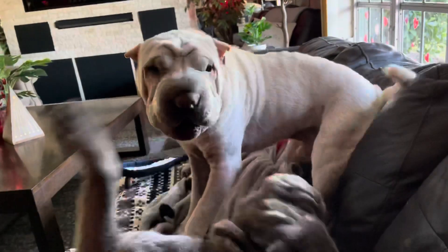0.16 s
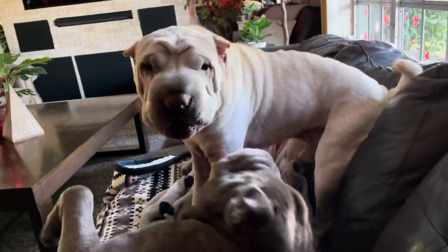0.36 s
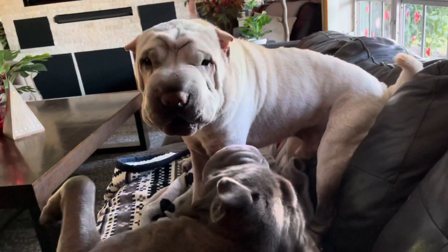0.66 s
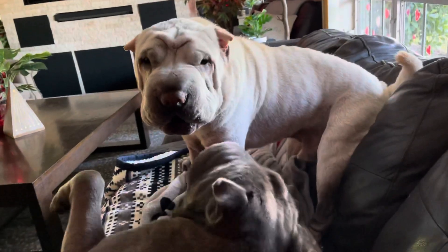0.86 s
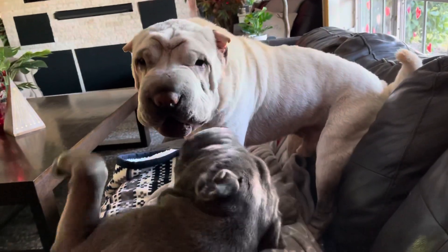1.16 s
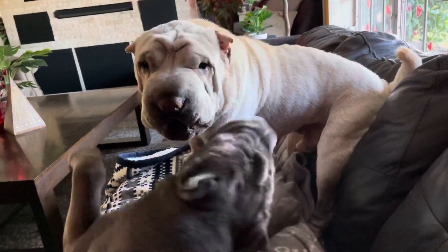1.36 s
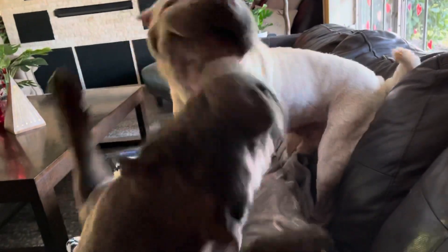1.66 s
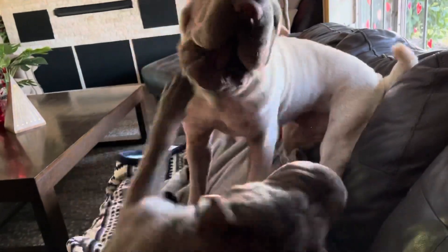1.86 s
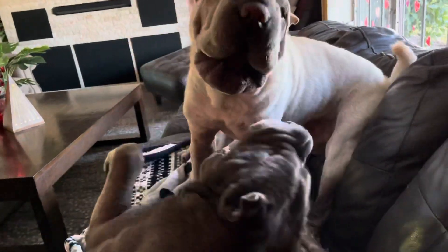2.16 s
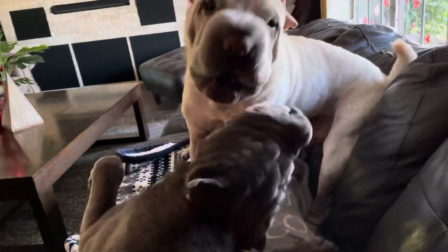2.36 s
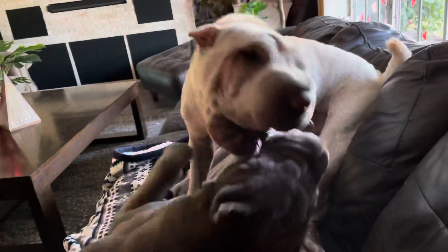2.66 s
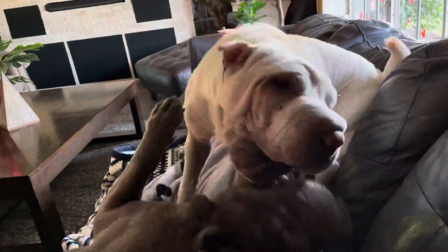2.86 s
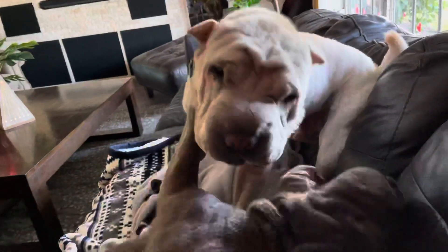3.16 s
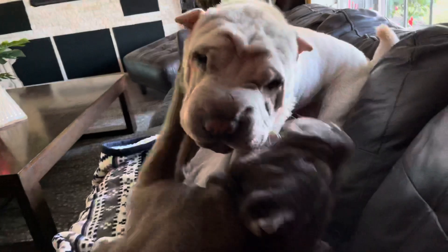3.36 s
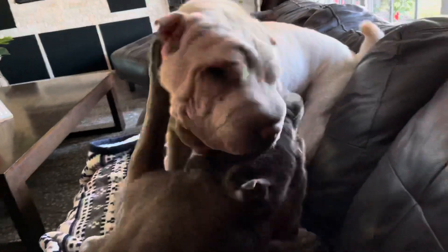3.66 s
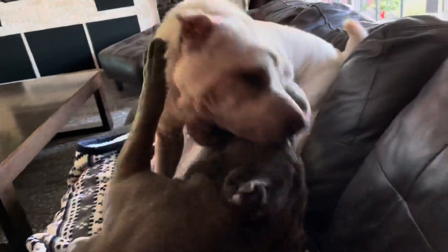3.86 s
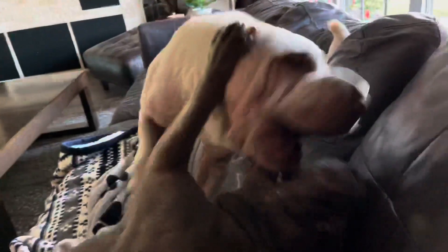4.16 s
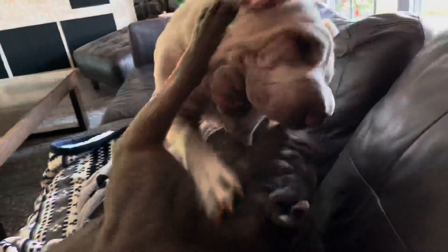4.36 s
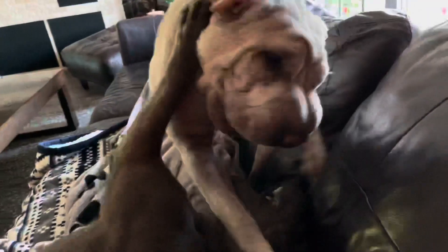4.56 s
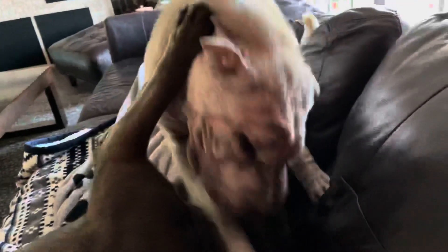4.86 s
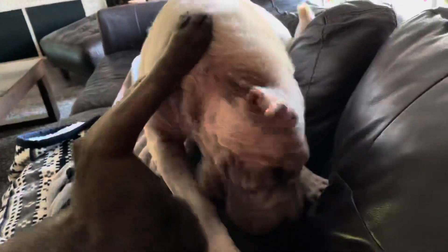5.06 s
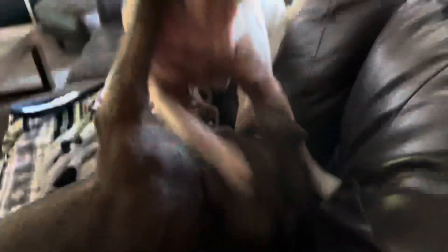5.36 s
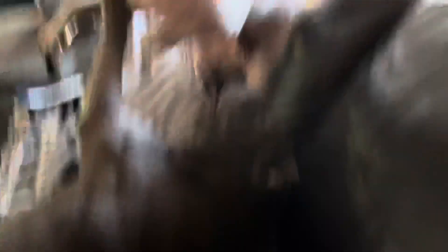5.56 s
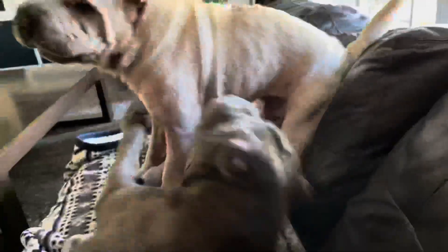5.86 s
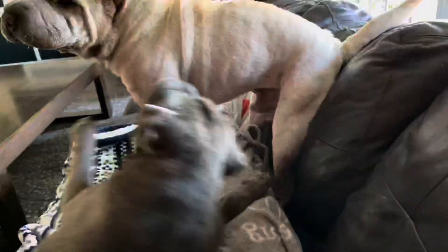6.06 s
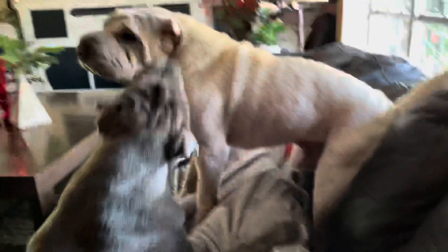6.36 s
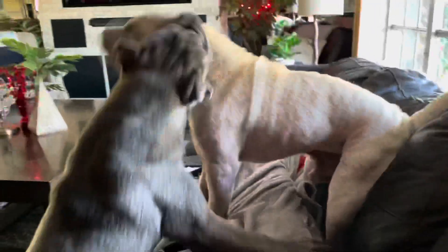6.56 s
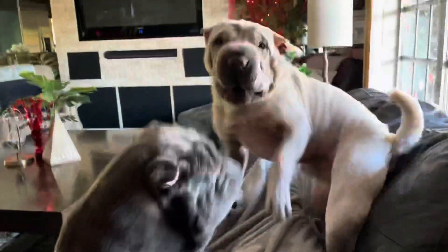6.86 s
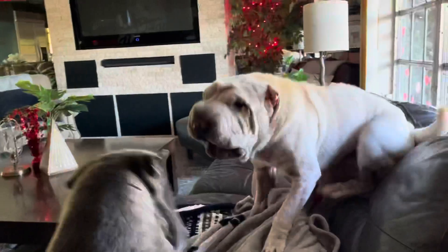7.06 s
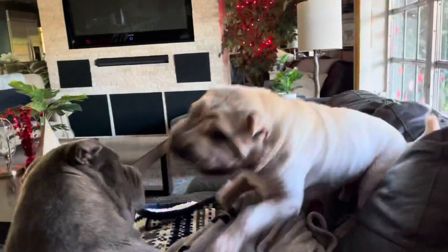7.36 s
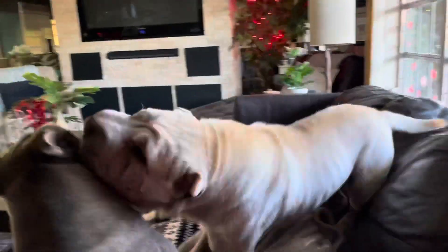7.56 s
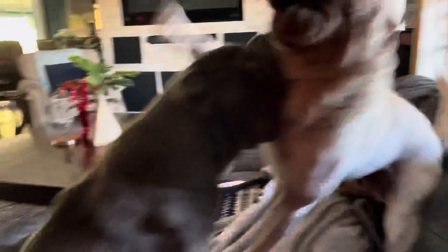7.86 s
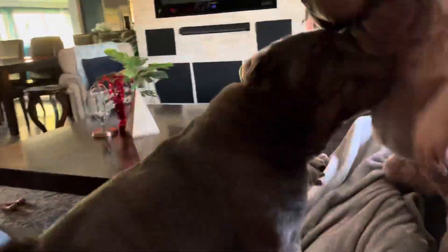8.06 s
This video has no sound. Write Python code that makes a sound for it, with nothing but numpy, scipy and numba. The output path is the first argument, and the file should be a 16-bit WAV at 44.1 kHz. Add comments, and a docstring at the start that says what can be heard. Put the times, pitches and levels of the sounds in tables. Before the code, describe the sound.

Two big dogs play-fight on a leather sofa, very close to a stereo microphone in a quiet, softly furnished room. From 0 to 0.4 s a breathy, rattling growl with a snort and a paw thump, then near quiet. Around 0.9-1.3 s a deep, slow fluttering growl pulses about fifty times a second. From 1.3 to 2.7 s short low hums and gruff, uneven growls alternate with snorts and tooth clicks. At 2.9-3.5 s come choppy growls and a small lip flutter. At 4.1 s one hard, bark-like throat burst is clearly loudest. Sparser rasps and breaths follow, with a snort and jaw snaps at 5.3 s and cushion bumps to 5.7 s. Airy panting leads near 6 s. Strong short growls return at 6.9 s, a leathery slap comes at 7.4 s, and humming growls with snaps crowd 7.5-8.2 s over deep rumble.

```python
"""Two dogs wrestle on a leather sofa in a living room, close to a microphone with two ports.
At first they growl in an uneven rattle of the vocal folds; near 0.9 s a slow warning flutter sets in quickly and
fades, and from 1.3 s the folds lock into short low hums. Loose lips flap at 3.1 s; the hardest flap of the throat
falls at 4.1 s. Near 6 s panting comes forward, then growls and hums return. Snorts, clicking teeth, paws and a deep
rumble run throughout. Fold pulses and air noise drive moving resonances; impacts ring short ones, in a quiet room."""
import sys
import numpy as np
from scipy import signal
from scipy.fft import rfft, irfft, next_fast_len
from scipy.io import wavfile
from scipy.ndimage import uniform_filter1d, map_coordinates
from numba import njit

SR = 44100
rng = np.random.default_rng(int(sys.argv[2]) if len(sys.argv) > 2 else 0)


def unload_audio(sound):
    """Save the sound as a 16-bit wav file, at the path given as the first command line argument."""
    columns = np.transpose(np.atleast_2d(sound))
    # keep every value between -1 and 1, then stretch to whole-number steps
    steps = np.round(np.clip(columns, -1, 1) * 32767)
    wavfile.write(sys.argv[1], SR, steps.astype(np.int16))


N = 362061
TIME = np.arange(N) / SR

# Table levels are set before the mix trims, the room and the microphone; attacks and releases are times for 20 dB.
# growls; the dB columns after throat_db are relative to it, the resonances shift further as the mouth opens:
# (start_s, length_s, release_s, fade_db over the length, throat_db, open_mouth_db, chest_db, rasp_db, snarl_db,
#  jaw_hz, tongue_hz, lip_hz)
GROWLS = [(0, 0.14, 0.04, 2, -38.5, 1.5, -2, -1, -6.5, 700, 1720, 2930),
          (0.13, 0.12, 0.09, 6.5, -39.5, -8, -5, -7, -9, 690, 1840, 2650),
          (0.347, 0.021, 0.16, -0.5, -49, -4.5, -10, -6.5, -12, 690, 1630, 2480),
          (1.33, 0.13, 0.07, 5, -39, -22, 0.5, -24, -24, 663, 1730, 2560),
          (1.47, 0.14, 0.11, 6.5, -40, -11.5, 2, -10.5, -15.5, 757, 2030, 2620),
          (1.646, 0.082, 0.03, 4.5, -35.5, -11, -6.5, -10, -17, 707, 1460, 3700),
          (1.787, 0.11, 0.033, 3.5, -38.5, -10, -0.5, -6, -16, 670, 1870, 3900),
          (2.081, 0.15, 0.055, -2.5, -35, -11, -4, -12, -10.5, 675, 1630, 2460),
          (2.25, 0.19, 0.094, 8.5, -40, -14, -10.5, -18, -11.5, 726.5, 1819, 2300),
          (2.463, 0.11, 0.071, 1.5, -36, -11, -3, -8, -15, 766, 2080, 2624),
          (2.684, 0.039, 0.038, 0, -39.5, -9.5, -16, -12, -11.5, 746, 1839, 3050),
          (2.911, 0.077, 0.065, -1, -34.5, -1.5, -4.5, -9.5, -7.5, 696, 1657, 2920),
          (3.004, 0.13, 0.024, 0.5, -38, -7, -6.5, -11.5, -10, 686, 1480, 3140),
          (3.135, 0.075, 0.04, 7, -34, -19, -7, -19, -20, 685, 1600, 3080),
          (3.23, 0.068, 0.034, 4.5, -42, -24, -9, -24, -15, 678, 1801, 3100),
          (3.425, 0.043, 0.042, -4, -35.5, -2, -1, -6.5, -10.5, 740, 1768, 2677),
          (3.659, 0.049, 1, 9, -49, -6.5, -17, -8, -17.5, 660, 1810, 2927),
          (3.804, 0.073, 0.045, 5.5, -40.5, -12, -1, -23, -19.5, 687, 1737, 3128),
          (3.939, 0.062, 0.07, 13.5, -39.5, 2, 6, -14, -15, 585, 1900, 4050),
          (4.001, 0.044, 0.036, -4.5, -24.5, -7.5, -4, -18, -14.5, 543, 1620, 3800),
          (4.065, 0.074, 0.044, 1.5, -21.5, -17.5, -8.5, -28, -18.5, 786, 1730, 3500),
          (4.211, 0.069, 0.037, 8, -42, -4, -2.5, -3, -5, 767, 2200, 2530),
          (4.326, 0.031, 0.025, -4, -32.5, -12, -3.5, -14, -6, 728.6, 1440, 3047),
          (4.539, 0.1, 0.098, 0.5, -42.5, -5.5, 3, -8, -9, 672.6, 1490, 2770),
          (4.914, 0.14, 0.077, -5, -48, -9, 7.5, -3.5, -10.5, 643, 1867, 2940),
          (5.073, 0.049, 0.061, -4, -33, -11, -8, -12.5, -17.5, 682, 1630, 3350),
          (5.169, 0.084, 0.061, -5.5, -54, -7, 8, 2, 9, 716, 1880, 2995),
          (5.292, 0.12, 0.096, -5, -44, 7, 4.5, 5.5, -9, 833, 1671, 3214),
          (5.633, 0.12, 0.13, -2, -48.5, -23, 0, -9.5, -11, 628, 1560, 2780),
          (6.46, 0.051, 0.086, -4.5, -50.5, -36, 1.5, -7, -10, 560, 1978, 2880),
          (6.858, 0.087, 0.024, 0, -28, -10, -3.5, -7.5, -13.5, 728, 1682, 3437),
          (6.966, 0.054, 0.046, 4, -36, -0.5, 2, -3, -12.5, 691, 1970, 2950),
          (7.04, 0.1, 0.16, 2, -48, -1, 0.5, -2.5, -7, 746, 1800, 2970),
          (7.538, 0.052, 0.059, 2, -39, 2, 3.5, -16.5, -15.5, 570.3, 1850, 3230),
          (7.607, 0.062, 0.07, 4.5, -31.5, -26, 0.5, -13, -15, 587.4, 1670, 3000),
          (7.756, 0.028, 0.039, -1, -40.5, 9, 7, 0, -5, 827.5, 1514, 3080),
          (7.835, 0.049, 0.21, 3.5, -30.5, -8.5, -1.5, -9, -14, 639.8, 1838, 3378),
          (7.932, 0.098, 0.067, 7, -29.5, -7, -9, -11, -17.5, 729, 1730, 2600),
          (8.036, 0.066, 0.028, -7, -36.5, -14, -6.5, -1.5, -8.5, 683.6, 1764, 3050),
          (8.165, 0.07, 0.06, 3, -33.5, -20, -14, -5, -21, 682, 1822, 2647)]
GROWL_ATTACK_S = 0.029
NOSE_SHARE_DB = -23.5   # air through the nose in every growl, relative to the throat
# the rattle of slack folds: (time_s, closures_per_s, unevenness as log spread, relative leak of air)
RATTLE = [(0, 110, .12, 1.6), (.25, 100, .12, 1.4), (.85, 104, .07, .15), (1.3, 108, .05, .1),
          (1.7, 94, .22, .55), (2.1, 77, .1, .3), (2.45, 77, .1, .3), (2.9, 95, .1, .7), (3.2, 77, .1, .35),
          (4.3, 80, .22, .55), (6.9, 100, .13, .35), (8.21, 103, .2, .55)]
# low tones: the folds lock into a hum, except at 7.05 s, where low room resonances near 130 Hz ring on after the
# bark: (start_s, length_s, level_db, fade_db, start_hz, middle_hz, end_hz)
LOW_TONES = [(1.345, 0.074, -26, 6, 124, 121.6, 110.1), (1.49, 0.078, -22.5, -2, 119.2, 121, 126.4),
             (1.61, 0.033, -21, 2, 136.3, 138.8, 138.2), (2.48, 0.097, -27, -8, 109.3, 107.1, 107.6),
             (3.82, 0.068, -28.5, -17, 137.4, 134.8, 132.3), (3.93, 0.12, -22.5, -10, 154.3, 154, 147.6),
             (4.07, 0.073, -21.5, 6, 137.7, 133.4, 122.3), (4.925, .11, -29, -4, 108.6, 104.3, 107.5),
             (5.06, 0.072, -26, -8, 123, 120.3, 123.2), (5.17, 0.067, -32, 10, 109, 105.5, 105.6),
             (6.864, .08, -23.5, 0, 123.8, 132.8, 136.1), (6.975, 0.059, -26, 9, 118.4, 120.9, 128.9),
             (7.05, .08, -40.5, 8, 129, 129.9, 130), (7.552, 0.12, -21, 5.5, 138.6, 145.5, 125.2),
             (7.836, 0.031, -21, 4, 131.4, 135.9, 146.5), (7.926, 0.083, -23.5, 3.5, 153, 153.7, 155.1)]
TONE_ATTACK_S, TONE_RELEASE_S, LOCK_MARGIN_S = 0.0055, 0.036, .018
# the mouth narrows and one resonance sings out and glides:
# (start_s, length_s, level_db, fade_db, start_hz, end_hz, width_hz)
SQUEEZES = [(.01, .13, -42, 4, 1080, 1150, 200), (1.342, 0.034, -41, -2, 855, 890, 120),
            (1.658, 0.016, -40, 5, 1930, 1950, 110), (1.693, 0.031, -31, 4, 700, 730, 50),
            (1.705, 0.022, -38, 7, 1730, 1950, 130.3), (1.648, 0.073, -43.5, -9, 3720, 3620, 220),
            (1.719, 0.053, -40.5, 8, 970, 1199, 90), (1.78, 0.096, -37.5, 8, 1070, 1140, 80.4),
            (1.783, 0.047, -43, -4, 3650, 3950, 700), (2.112, 0.081, -34.5, 13, 663, 737, 50),
            (2.157, 0.062, -51, -4, 3700, 3700, 240), (2.254, 0.18, -49.5, -1, 1600, 1960, 90),
            (2.487, .1, -40, 1, 2693, 2563, 110.3), (2.472, 0.14, -37, 7.5, 869.3, 881, 125.8),
            (3.16, 0.058, -35, 7, 720, 684.3, 40), (3.259, .05, -57.5, 6, 1775, 1800, 80.22),
            (3.982, 0.034, -43.5, -5, 2160, 2137, 108), (3.983, 0.031, -40.5, -4, 1228, 1560, 80.07),
            (4.02, 0.023, -33, -5, 1629, 1679, 49.85), (4.022, 0.023, -38.5, 0, 1810, 1940, 60),
            (4.022, 0.031, -41.5, -5, 3700, 3550, 350), (4.094, 0.038, -20.5, 7, 740, 850, 119),
            (4.213, 0.037, -45, 1, 2800, 2630, 120), (4.23, 0.04, -43.5, -1, 2219, 2483, 89.9),
            (5.073, 0.056, -38.5, 1, 1670, 1731, 110), (5.145, 0.036, -51, 5, 3200, 2880, 200.3),
            (5.351, 0.056, -37, -7, 2020, 2373, 450), (5.366, 0.12, -44, 4, 1137, 1200, 110),
            (5.642, 0.135, -59.5, -3, 2620, 2550, 90), (6.865, 0.06, -28, 1, 850, 792.3, 110),
            (6.928, 0.016, -26, -6, 699.5, 678.5, 60.1), (6.93, 0.075, -36.5, 6, 930, 981, 129.9),
            (6.863, 0.14, -56, -3, 2810, 2964, 180), (7.674, .055, -46.5, -5, 2760, 2834, 170),
            (7.767, 0.042, -31.5, 2, 1067, 916.4, 109.8), (7.92, 0.04, -25.5, -1, 700.4, 795, 70.02),
            (7.938, 0.054, -34, 6, 1148, 1660, 130.6), (7.964, 0.063, -36, 0, 2530, 1877, 220),
            (7.957, 0.087, -42.5, 3, 3020, 3120, 300.5), (8.078, 0.032, -41, 0, 2998, 3353, 200.6),
            (8.083, 0.019, -29, 10, 643, 681.5, 50.1)]
SQUEEZE_ATTACK_S, SQUEEZE_RELEASE_S = 0.015, 0.018
# snorts through the nose: (start_s, length_s, level_db, attack_s, release_s)
SNORTS = [(0.087, 0.087, -41.5, 0.19, 0.11), (1.237, 0.21, -67.5, 0.51, 0.083),
          (1.49, 0.1, -54.5, 0.092, 0.082), (1.663, 0.15, -46, 0.2, 0.12), (2.116, 0.37, -54.5, 0.055, 0.1),
          (2.483, 0.059, -38.5, 0.045, 0.098), (2.676, 0.029, -52.5, 0.048, 0.056),
          (2.889, 0.32, -48, 0.045, 0.16), (3.431, 0.03, -40.5, 0.06, 0.097),
          (3.995, 0.041, -48.5, 0.18, 0.15), (4.211, 0.14, -47, 0.14, 0.028),
          (4.558, 0.11, -45, 0.19, 0.094), (4.914, 0.61, -55, 0.2, 0.12), (5.315, 0.11, -31.5, 0.14, 0.073),
          (5.69, 0.043, -64, 0.23, 0.27), (6.031, 0.07, -47.5, 0.099, 0.17),
          (6.643, 0.068, -56, 0.1, 0.081), (6.885, 0.02, -44, 0.087, 0.22),
          (7.657, 0.14, -44.5, 0.19, 0.019), (7.838, 0.29, -52, 0.054, 0.047),
          (8.189, 0.04, -46.5, 0.034, 0.077)]
# the warning growl, a slow flutter of the folds: (time_s, strong_closures_per_s)
FLUTTER = [(.882, 51.4), (1.125, 51.6), (1.145, 45.5), (1.33, 45.5)]
# level of the flutter, one row: (start_s, length_s, level_db, fade_db, attack_s, release_s)
FLUTTER_LEVEL = (.91, .4, -33, 5, .03, .16)
# chest, throat and mouth ringing under the flutter:
# (resonance_hz, width_hz, level_db, fade_db_per_s as the mouth closes)
FLUTTER_RINGS = [(51.6, 15, -15, 0), (143, 58, -3, -3), (220, 27, -7, -4), (616, 82, -1.5, 7),
                 (740, 47, -14, -1), (970, 20, -15.5, 10), (1570, 84, -18.5, 5), (1850, 61, -22, 4)]
FLUTTER_WEAK_DB = -11   # the weak closures between the strong ones, as the throat gets them
# voiceless pants; mouth_db and teeth_db are relative to throat_db:
# (start_s, length_s, throat_db, mouth_db, teeth_db, jaw_hz, tongue_hz, lip_hz)
PANTS = [(1.935, 0.13, -54, -1.5, -2.5, 726, 2150, 3003), (2.744, 0.38, -56, -10.5, -4, 696, 1440, 2800),
         (3.522, 0.092, -60.5, 1, -3, 674, 2350, 2615), (4.422, 0.073, -52, -7.5, -4, 716, 1609, 2959),
         (4.752, 0.12, -57, -9, -14, 715, 1610, 3220), (5.465, 0.12, -60, -3, -4, 710, 1638, 2592),
         (5.932, 0.25, -52.5, -8.5, -6, 690, 1738, 2713), (6.252, 0.27, -65, -6, -0.5, 686, 1570, 2950),
         (6.62, 0.071, -48.5, -4, -4.5, 830, 1857, 3600), (7.27, 0.19, -56.5, -8, -5.5, 620, 1570, 3093)]
PANT_ATTACK_S, PANT_RELEASE_S = 0.037, 0.092
# loose lips flap in the breath of a growl, one row: (first_s, flaps_per_s, level_db, loss_db per flap, resonance_hz)
LIP_FLAPS = (3.122, 27.5, -41, 1.8, 3300)
# single hard flaps of throat and jowls: (time_s, peak_db, resonance_hz)
FLAPS = [(.035, -21.5, 726), (.176, -24, 636), (.468, -42, 675), (.612, -48, 517), (.9975, -19, 617),
         (1.037, -19, 623), (1.093, -21, 610), (1.132, -19, 630), (1.177, -21, 680), (1.2205, -19.5, 680),
         (1.785, -23.5, 570), (1.834, -26, 500), (1.859, -34, 1100), (1.884, -26, 1090),
         (2.079, -16.5, 630), (2.217, -27, 680), (2.264, -34, 704.8), (2.909, -22.5, 704),
         (2.927, -18, 710.3), (2.96, -25, 1020), (3.088, -21, 658.2), (3.131, -17, 646.4),
         (3.202, -26, 650), (3.29, -28, 676), (3.439, -19, 647), (3.467, -24, 720), (3.862, -24, 648.4),
         (4.002, -23, 673.8), (4.074, -2, 694), (4.082, -9.5, 710), (4.112, -14.5, 856), (4.125, -9, 770),
         (4.316, -25, 726), (4.333, -18, 718.7), (4.371, -25.5, 800), (4.748, -22.5, 726),
         (5.301, -22, 758.6), (5.349, -14.5, 850), (5.374, -19, 1160), (6.493, -26, 564),
         (6.872, -13, 800.4), (6.915, -15, 794), (6.985, -18.5, 521.5), (7.018, -23.5, 899.5),
         (7.585, -18, 519.7), (7.622, -14.5, 621), (7.648, -13.5, 543.5), (7.786, -13, 1060),
         (7.849, -20, 597)]
# teeth and lips snapping: (time_s, peak_db, pitch_hz)
CLICKS = [(1.198, -30, 1610), (1.482, -20.5, 2360), (1.664, -21.5, 1700), (1.721, -21, 4460),
          (1.809, -23, 1830), (1.885, -36, 2530), (2.029, -34.5, 4500), (2.757, -39, 2660),
          (4.2108, -22, 2610), (4.5892, -19.5, 1440), (4.748, -31, 1493), (5.3, -17.5, 3600),
          (5.351, -14, 4280), (7.7576, -17, 1820), (7.757, -31, 3563), (7.787, -32, 3285),
          (7.844, -30.5, 3550), (7.85, -23, 1850), (8.162, -18.5, 2210), (8.173, -22, 1890)]
# paws landing: (time_s, level_db, slap_db relative to the thump)
PAWS = [(0.002, -19, -10.5), (0.227, -24.5, -3), (2.271, -24.5, -21), (5.402, -18.5, -10), (5.67, -36, 1),
        (5.715, -28.5, 11), (6.195, -32.5, -33), (6.272, -35, -27), (6.495, -28, -24), (7.428, -22, 34)]
# deep rumble of the growls and of bodies on the cushions: (time_s, level_db)
RUMBLES = [(.4, -63), (.62, -59), (0.982, -41), (1.1, -33), (1.25, -34.5), (1.38, -54), (1.48, -33.5),
           (1.68, -44), (1.83, -45), (2.09, -45), (2.49, -35.5), (2.96, -42), (3.15, -48), (3.46, -47),
           (4.03, -45), (4.23, -39), (4.36, -37.5), (4.7, -44), (5.3, -44), (5.43, -45), (5.7, -43),
           (6.22, -41), (6.48, -40.5), (6.66, -45.5), (6.92, -35), (7.47, -42), (7.67, -30.5), (7.78, -44),
           (7.97, -35), (8.1, -39), (8.2, -46)]
RUMBLE_ATTACK_S, RUMBLE_RELEASE_S = 0.14, 0.19
RUMBLE_SHARE_DB = -9.5   # rumble that follows each growl, relative to its chest sound
# spectral shape of the chest: (frequency_hz, gain_db)
CHEST = [(40, -14.5), (75, -4.5), (125, 6), (195, -4), (245, -1.5), (330, -9.5), (480, -11), (700, -42),
         (1200, -74)]
# spectral shape of the nose: (frequency_hz, gain_db)
NOSE = [(2500, 33.5), (3900, -5.5), (4800, -4.5), (5900, -2), (6900, -4), (8200, -1), (9200, 0), (10400, 6),
        (11300, 2.5), (12000, -13.5), (12700, -12.5)]
# spectral shape of the deep rumble: (frequency_hz, gain_db)
RUMBLE_SHAPE = [(10, -55.5), (24, -60), (35, -16), (50, 4), (75, -5), (110, -2.5), (200, -17.5),
                (500, -44.5)]
# spectral shape of the quiet room: (frequency_hz, gain_db)
ROOM_TONE = [(10, -40), (28, -40), (45, 10.5), (60, 14.5), (137, -24), (200, -9), (324, -10), (650, -9),
             (1210, -25), (3250, -34.5), (6270, -60), (10500, -58), (12700, -81)]
ROOM_TONE_DB = -56
# where the heads are: (time_s, left_right_db in the middle frequencies)
PAN = [(0, 2), (1.07, 8), (1.9, -0.5), (2.24, 3), (2.49, -1), (3.59, 1), (4.57, -0.5), (5.26, 0.5),
       (5.5, 1), (5.65, 2), (6.4, 4), (6.79, 0.5), (7.02, 3), (7.32, 3), (7.64, 2.5), (7.77, -1),
       (8.21, -1.5)]
# phase between the two microphone ports: (frequency_hz, left_lead_rad)
PORT_PHASE = [(700, 0), (1300, -.3), (1900, .1), (2200, .7), (2800, 1.1), (4100, .5), (5300, .7),
              (6500, .2), (7500, .85), (8700, 0), (9300, -1.4), (9820, -2.6), (10270, -3.14),
              (10700, -3.75), (11850, -6.28)]
# level between the two microphone ports: (frequency_hz, left_right_db)
PORT_BALANCE = [(300, 0), (700, -.8), (1200, -3.5), (1900, -2), (3300, 3), (6000, 2), (8500, 0)]
ROOM_T60_S = 0.29
CUTOFF_HZ = 12500


def growls(waver_db=1.3, waver_per_s=45):
    """One train of fold pulses drives chest, throat, mouth and nose."""
    regular = locked()
    pulses, cycles = folds(regular)
    spurts = turbulence(pulses, decay_s=0.0085)
    closures = rms_one(pulses)
    # locked folds leak less air than rattling ones
    leak = (1 - regular) * curve(RATTLE, column=3)
    glottis = closures + (0.98 + 0.28 * leak) * spurts + leak * rng.standard_normal(N)
    jaw_hz, tongue_hz, lip_hz = gape() * np.array(posture(GROWLS))
    opening = open_mouth(glottis + rng.standard_normal(N), jaw_hz)
    voice = from_db(0.5) * effort() * throat(glottis, jaw_hz) + from_db(-1.5) * effort(column=5) * opening
    breath = (0.2 + 0.6 * leak + .4 * regular) * rng.standard_normal(N)
    hoarse = passages(.2 * closures + spurts + breath)
    rasp = from_db(-0.8) * effort(column=7) * mouth(hoarse, tongue_hz)
    bite = from_db(-1.2) * effort(column=8) * snarl(hoarse, lip_hz)
    # the push of the lungs is never quite steady
    waver = from_db(waver_db * drift(waver_per_s))
    body = chest(closures, spurts, regular)
    air = snorts(pulses, leak, regular)
    steady = low_tones(cycles) + squeezes(closures + 0.87 * spurts)
    return waver * (catches() * (voice + rasp + bite) + body + air) + steady


def locked():
    """One during the low tones, when the pulses are regular, zero in the rattle, with soft edges."""
    inside = sum((TIME >= s - LOCK_MARGIN_S) & (TIME < s + length + LOCK_MARGIN_S) for s, length, *_ in LOW_TONES)
    return uniform_filter1d(np.minimum(inside, 1.), size=600)


def tone_pitch():
    """Each low tone bends through its three pitches."""
    points = [(s + k * length / 2, hz) for s, length, _, _, *bend in LOW_TONES for k, hz in enumerate(bend)]
    return curve(points, column=1)


def folds(regular, tone_jitter=.03, shimmer_db=2.5, tone_shimmer_db=3.2, doubling_db=2.5):
    """Closures of the vocal folds and their phase: uneven in a rattle, on pitch in a low tone."""
    pitch = regular * tone_pitch() + (1 - regular) * curve(RATTLE, column=1)
    jitter = regular * tone_jitter + (1 - regular) * curve(RATTLE, column=2)
    cycles = np.cumsum(pitch * np.exp(drift(110) * jitter)) / SR
    spread_db = regular * tone_shimmer_db + (1 - regular) * shimmer_db
    force_db = np.clip(rng.standard_normal(N), -2, 1.3) * spread_db
    # slack folds close strongly and weakly in turn
    force_db = force_db + (1 - regular) * doubling_db * np.cos(np.pi * cycles)
    return np.diff(np.floor(cycles), prepend=0) * from_db(force_db), cycles


def turbulence(pulses, decay_s):
    """Each closure releases a spurt of noisy air."""
    flow = signal.lfilter([1], [1, -np.exp(-1 / (decay_s * SR))], pulses)
    return rms_one(flow * rng.standard_normal(N))


def chest(closures, spurts, regular):
    """Closures and spurts sound in the chest; in a low tone only the overtones are taken from here."""
    body = coloured(closures + 2.45 * (1 - .68 * regular) * spurts, CHEST)
    overtones = cut(body, 124.0, "high", order=4)
    blend = regular * evened(overtones) + (1 - regular) * evened(body)
    return effort(column=6) * from_db(6.0) * blend


def low_tones(cycles):
    """The hums' fundamental and the room ringing on at 7.05 s: a clean cosine on the phase, trembling in level."""
    swell = envelope((s, length, db, fade_db, TONE_ATTACK_S, TONE_RELEASE_S)
                     for s, length, db, fade_db, *_ in LOW_TONES)
    tremor_db = 1.8 * drift(45)
    return swell * from_db(tremor_db - 1.0) * np.sqrt(2) * np.cos(2 * np.pi * cycles)


def throat(source, hz, ring_db=2):
    """The jaw resonance: a broad hump with a narrow core that rings on between pulses."""
    hump = resonate(source, hz, 440)
    ringing = resonate(hump, hz, 190) + from_db(ring_db) * resonate(hump, hz, 40)
    return evened(cut(cut(ringing, 390, "high", order=3), 737, "low", order=4), seconds=0.04)


def open_mouth(source, jaw_hz):
    """A second resonance rises with the jaw; the sound falls off steeply beyond it."""
    hz = (630 + 0.55 * jaw_hz) * np.exp(0.09 * drift(12))
    ringing = resonate(resonate(source, hz, 88), hz, 320)
    return evened(cut(cut(ringing, 810, "high", order=4), 566, "low", order=4))


def mouth(source, hz):
    """One resonance follows the tongue; two weaker ones belong to the muzzle."""
    muzzle = resonate(source, 1480 * np.exp(0.12 * drift(5.2)), 320)
    muzzle = muzzle - resonate(source, 2050 * np.exp(0.12 * drift(9)), 260)
    ringing = resonate(source, hz, 227) + from_db(-6.0) * muzzle
    return evened(cut(cut(ringing, 1260, "high", order=4), 2930, "low", order=6), seconds=0.087)


def snarl(source, hz, rush_db=-12):
    """One resonance follows the lips, over a broad rush of air between the teeth."""
    lip_ring = resonate(source, hz, 220)
    teeth = resonate(source, 3600 * np.exp(.07 * drift(9)), 900)
    hiss = lip_ring + from_db(-14.5) * teeth + from_db(rush_db) * source
    return evened(cut(cut(hiss, 1230, "high", order=4), 5150, "low", order=4), seconds=0.067)


def passages(x, strength=0.55, wander=0.202):
    """Echoes inside muzzle and nose, of changing length, carve moving peaks into the air noise."""
    out = x.copy()
    for lag_s in (.0007, .0013, .0023, .0037):
        echo = delayed(x, lag_s * np.exp(wander * drift(5) / 2))
        out += strength * rng.choice([-1, 1]) * echo
    return rms_one(out)


def snorts(pulses, leak, regular):
    """Air pushed through the nose, in snorts of its own and as a share of each growl."""
    bursts = envelope((s, length, db, 0, attack, release) for s, length, db, attack, release in SNORTS)
    level = from_db(4.0) * np.hypot(bursts, from_db(NOSE_SHARE_DB) * effort())
    breath = (0.15 + 2.65 * leak + 0.42 * regular) * rng.standard_normal(N)
    return nose(turbulence(pulses, decay_s=0.0055) + breath, level)


def nose(source, level, bright_at_db=-45, brightening=0.041, flicker_db=4.0):
    """Hiss from the nostrils, cut steeply at its lower edge; its top is louder when the hiss is louder."""
    hiss = evened(cut(coloured(passages(source), NOSE), 4124, "high", order=8))
    top = spectral(hiss, lambda hz: np.interp(hz, [7500, 10500], [0, 1]))
    top_db = brightening * np.clip(20 * np.log10(level + 1e-9) - bright_at_db, -20, 6)
    # the hiss flickers between its lower and upper range
    tilt_db = flicker_db * drift(16)
    return level * (from_db(-tilt_db / 2) * (hiss - top) + from_db(top_db + tilt_db) * top)


def squeezes(source):
    """The voice rings in a narrow resonance that glides as tongue and lips move."""
    out = np.zeros(N)
    for s, length, db, fade_db, start_hz, end_hz, width_hz in SQUEEZES:
        near = slice(int((s - .1) * SR), int((s + length + .1) * SR))
        hz = np.interp(TIME[near], [s, s + length], [start_hz, end_hz])
        ring = resonate(resonate(source[near], hz, width_hz), hz, 2 * width_hz)
        swell = envelope([(s, length, db, fade_db, SQUEEZE_ATTACK_S, SQUEEZE_RELEASE_S)])
        out[near] += evened(ring, seconds=0.069) * swell[near]
    return out


def catches(depth_db=-1.5, before_s=0.013, after_s=0.00083):
    """The voice catches for an instant as pressure builds for a flap, a snap or a lunge."""
    held = np.zeros(N)
    for s, *_ in list(FLAPS) + list(PAWS) + list(CLICKS):
        held[max(int((s - before_s) * SR), 0):int((s + after_s) * SR)] = 1
    return from_db(depth_db * uniform_filter1d(held, size=180))


def effort(column=None):
    """Envelope of the growls in the throat, or in the part whose relative level is in the given column."""
    return envelope((g[0], g[1], g[4] + (g[column] if column else 0), g[3], GROWL_ATTACK_S, g[2]) for g in GROWLS)


def gape(rise_per_db=0.25, memory_s=0.053):
    """The mouth opens as a growl swells and closes as it dies: a factor on its resonances."""
    db = 20 * np.log10(effort() + 0.012)
    surge_db = db - uniform_filter1d(db, size=int(memory_s * SR))
    return np.exp(rise_per_db * (np.clip(surge_db, -10, 10) - 0.5))


def posture(events):
    """Jaw, tongue and lip resonances: held through the middle of each sound, gliding from one to the next."""
    poses = [(e[0] + part * e[1], *e[-3:]) for e in events for part in (.25, .75)]
    return curve(poses, column=1), curve(poses, column=2), curve(poses, column=3)


def flutter(shimmer_db=1.8, nose_db=-16.5):
    """Strong and weak closures alternate, ring chest and throat, and send spurts of hiss through the nose."""
    started = TIME >= FLUTTER[0][0]
    cycles = np.cumsum(curve(FLUTTER, column=1) * started) / SR + .04 * drift(60) * started
    # two closures in each cycle
    counted = np.ceil(2 * np.maximum.accumulate(cycles))
    closures = np.diff(counted, prepend=0) * from_db(shimmer_db * rng.standard_normal(N))
    pulses = closures * from_db(FLUTTER_WEAK_DB * np.sin(np.pi * cycles) ** 2)
    source = rms_one(pulses) + .38 * turbulence(pulses, decay_s=0.008)
    age = np.clip(TIME - FLUTTER_LEVEL[0], 0, FLUTTER_LEVEL[1])
    rings = np.zeros(N)
    for hz, width_hz, db, fade_db in FLUTTER_RINGS:
        ring = rms_one(resonate(resonate(source, hz, width_hz), hz, hz / 2))
        rings += from_db(db - fade_db * age) * ring
    level = envelope([FLUTTER_LEVEL])
    spurts = turbulence(closures + pulses, decay_s=0.003)
    hiss = nose(spurts, from_db(nose_db) * level, flicker_db=0.0)
    return level * cut(rings, 1770, "low", order=8) + cut(hiss, 8500, "low", order=3)


def pant_level(column=None):
    """Envelope of the pants in the throat, or in the part whose relative level is in the given column."""
    return envelope((p[0], p[1], p[2] + (p[column] if column else 0), 0, PANT_ATTACK_S, PANT_RELEASE_S)
                    for p in PANTS)


def pants(chest_db=-2, nose_db=-3, teeth_hz=2700, teeth_width_hz=2600):
    """Between growls the dogs' breath rushes through the same cavities with the folds open."""
    in_throat, in_mouth, at_teeth = pant_level(), pant_level(column=3), pant_level(column=4)
    jaw_hz, tongue_hz, lip_hz = posture(PANTS)
    air = rng.standard_normal(N)
    # with the folds open the cavities are damped and ring broadly
    low = rms_one(cut(resonate(air, jaw_hz, 330), 960, "low", order=4))
    low = low + from_db(-5.0) * open_mouth(air, jaw_hz) + from_db(chest_db) * coloured(air, CHEST)
    teeth = resonate(air, lip_hz, 500) + resonate(air, teeth_hz, teeth_width_hz)
    high = from_db(-0.5) * at_teeth * rms_one(cut(teeth, 1500, "high"))
    high = high + nose(air, from_db(nose_db) * at_teeth)
    middle = mouth(rng.standard_normal(N), tongue_hz)
    return from_db(1.5) * in_throat * low + from_db(2.0) * in_mouth * middle + high


def lips(flap_count=5):
    """Each flap of the lips lets out a short spurt of air."""
    first, per_s, db, loss_db, hz = LIP_FLAPS
    spurts = envelope((first + k / per_s - .003, .006, db - loss_db * k, 0, .01, .02) for k in range(flap_count))
    return spurts * rms_one(resonate(resonate(rng.standard_normal(N), hz, 1300), hz, 1900))


def flaps():
    """A hard closure sets throat and chest ringing."""
    out = np.zeros(N)
    for s, db, hz in FLAPS:
        push = puff(decay_s=.004, grit=.02)
        add(out, s, db, resonate(resonate(push, hz, 132), hz, 290) + 0.013 * resonate(push, 230, 90))
    return out


def clicks():
    """Teeth and wet lips snap in the mouth cavity."""
    out = np.zeros(N)
    for s, db, hz in CLICKS:
        snap = puff(decay_s=.005, grit=.2)
        add(out, s, db, resonate(resonate(snap, hz, 400), hz, 1550) + 0.2 * resonate(snap, 1900, 5300))
    return out


def paws():
    """A dull push into the cushion and a slap on its leather."""
    out = np.zeros(N)
    for s, db, slap_db in PAWS:
        push = puff(decay_s=0.026, grit=0.12)
        thump = rms_one(cut(cut(resonate(push, 125, 42), 650, "low"), 180, "high"))
        slap = rms_one(cut(resonate(push, 480, 220), 1300, "low"))
        add(out, s, db + 0.5, thump + from_db(slap_db) * slap)
    return out


def rumble():
    """Deep rumble of the growls and of bodies on the cushions: low noise in slow swells."""
    swells = envelope((s, 0, db, 0, RUMBLE_ATTACK_S, RUMBLE_RELEASE_S) for s, db in RUMBLES)
    level = np.hypot(swells, from_db(RUMBLE_SHARE_DB) * effort(column=6))
    return level * evened(coloured(rng.standard_normal(N), RUMBLE_SHAPE), seconds=0.21)


def head_turns(x):
    """As the heads swing, the middle frequencies lean towards one port and their phase wanders between the two."""
    middle = spectral(x, lambda hz: np.interp(hz, [300, 1200, 6000, 9000], [0, 1, 1, 0]))
    lean = np.tanh(curve(PAN, column=1) * np.log(10) / 40) * middle
    quadrature = np.imag(signal.hilbert(middle, next_fast_len(N)))[:N]
    return x + (lean + .25 * drift(7) * quadrature) * np.array([[1], [-1]])


def furniture(x, bounce_db=-12.0, low_hz=700, high_hz=6500, wander=0.126):
    """Short bounces off table, floor and sofa back shift in delay and reach the two ports in opposite sign."""
    middle = cut(cut(x, low_hz, "high"), high_hz, "low", order=4)
    bounces = sum(delayed(middle, lag_s * np.exp(wander * drift(3))) for lag_s in (.0016, .0034, .0061))
    return from_db(bounce_db) * bounces / np.sqrt(3) * np.array([[1], [-1]])


def living_room(x, wet_db=-13, treble_db=6, treble_t60_s=0.095):
    """Dense reflections, different at each port, that die sooner in the treble."""
    age = TIME[:SR // 2]
    noise = rng.standard_normal((2, len(age))) * (age > .002)
    slow = cut(noise, 3450, "low") * from_db(-60 * age / ROOM_T60_S)
    tail = slow + cut(noise, 810, "high") * from_db(treble_db - 60 * age / treble_t60_s)
    # long waves reach both ports alike
    mid, side = tail[0], 1.4 * cut(tail[1], 300, "high", order=1)
    tail = (mid + side * np.array([[1], [-1]])) / np.sqrt(np.sum(from_db(-120 * age / ROOM_T60_S)))
    tail = cut(cut(tail, 134, "high"), 9400, "low")
    return from_db(wet_db) * signal.fftconvolve(x[None], tail, axes=1)[:, :N]


def room_tone():
    """The quiet room: steady noise, strongest in the bass."""
    return from_db(ROOM_TONE_DB) * coloured(rng.standard_normal(N), ROOM_TONE)


def ports(x):
    """The sound reaches the two ports with a small difference in phase and level, set by frequency."""
    sides = np.array([[.5], [-.5]])
    return spectral(x, lambda hz: from_db(sides * at_hz(PORT_BALANCE, hz)) * np.exp(1j * sides * at_hz(PORT_PHASE, hz)))


def from_db(db):
    """Decibels to gain."""
    return 10 ** (np.asarray(db) / 20)


def rms_one(x):
    """Scale to unit power."""
    return x / np.sqrt(np.mean(x ** 2) + 1e-20)


def evened(x, seconds=0.091):
    """Hold the power near one over a few pulses, leaving each pulse its shape."""
    size = max(int(seconds * SR), 8)
    power = uniform_filter1d(uniform_filter1d(x * x, size), size // 2)
    return x / np.sqrt(np.abs(power) + 1e-12)


def curve(rows, column):
    """One column of a table, joined in time."""
    rows = np.array(sorted(map(tuple, rows)))
    return np.interp(TIME, rows[:, 0], rows[:, column])


def at_hz(points, hz):
    """Read a spectrum on a log-frequency axis."""
    points = np.array(points)
    return np.interp(np.log(hz + 1), np.log(points[:, 0]), points[:, 1])


def spectral(x, response):
    """Filter by a gain that is a function of frequency."""
    size = next_fast_len(N + SR)
    return irfft(rfft(x, size) * response(np.arange(size // 2 + 1) * SR / size), size)[..., :N]


def coloured(x, spectrum):
    """Give a sound a spectrum; unit power."""
    return rms_one(spectral(x, lambda hz: from_db(at_hz(spectrum, hz))))


def cut(x, hz, kind, order=2):
    """Butterworth filter."""
    return signal.sosfilt(signal.butter(order, hz, kind, fs=SR, output="sos"), x + 1e-18)


def drift(per_s):
    """Random curve through per_s normal values a second, joined by straight lines."""
    return np.interp(TIME * per_s, np.arange(4000), rng.standard_normal(4000))


def delayed(x, lag_s):
    """Delay by a time that may change from sample to sample."""
    return map_coordinates(x, [(TIME - lag_s) * SR], order=1)


@njit
def sweep(x, turn, radius):
    """Two-pole resonance whose centre moves from sample to sample."""
    y = np.zeros(len(x))
    for i in range(2, len(x)):
        push = (1 - radius ** 2) / 2 * (x[i] - x[i - 2])
        y[i] = push + 2 * radius * np.cos(turn[i]) * y[i - 1] - radius ** 2 * y[i - 2]
    return y


def resonate(x, hz, width_hz):
    """Resonance with gain one on top."""
    return sweep(x, 2 * np.pi * hz / SR * np.ones(len(x)), np.exp(-np.pi * width_hz / SR))


def puff(decay_s, grit):
    """A click followed by a short dying noise."""
    age = TIME[:SR // 5]
    return (age == 0) + grit * rng.standard_normal(len(age)) * np.exp(-age / decay_s)


def add(out, s, peak_db, sound):
    """Mix in a short sound at a time and peak level."""
    start = max(int(s * SR), 0)
    out[start:start + len(sound)] += (from_db(peak_db) * sound / np.abs(sound).max())[:N - start]


def envelope(events):
    """Attack, slowly fading hold and release of (start_s, length_s, db, fade_db, attack_s, release_s); powers add."""
    t, power = TIME[::32], 1e-14
    for s, length, db, fade_db, attack, release in events:
        held = np.clip((t - s) / max(length, 1e-3), 0, 1) - .5
        rise = np.maximum(s - t, 0) / max(attack, 1e-3)
        fall = np.maximum(t - s - length, 0) / max(release, 1e-3)
        power = power + from_db(db - fade_db * held - 20 * np.minimum(rise + fall, 10)) ** 2
    return np.interp(TIME, t, np.sqrt(power))


def scene():
    """Dogs and their deep rumble in the room, over its quiet background."""
    dogs = growls() + flutter() + pants() + lips() + flaps() + clicks() + paws()
    direct = ports(head_turns(dogs) + rumble() + room_tone())
    return direct + furniture(dogs) + living_room(dogs)


def record(dry):
    """The microphone loses the deepest bass and rounds the highest peaks; the top is cut steeply."""
    heard = cut(dry, 31, "high", order=4)
    rounded = heard / (1 + (heard / .95) ** 4) ** .25
    return signal.sosfilt(signal.ellip(10, .2, 80, CUTOFF_HZ, fs=SR, output="sos"), rounded)


dry = scene()
out = record(dry)
unload_audio(out)
```